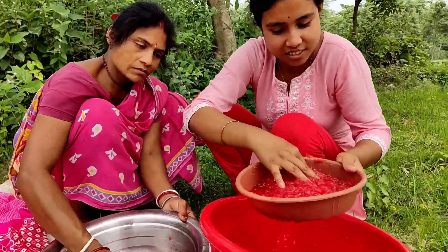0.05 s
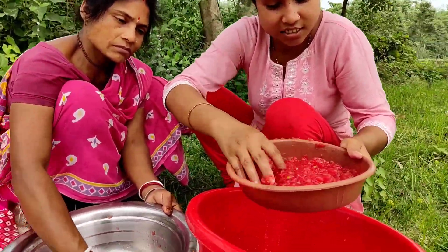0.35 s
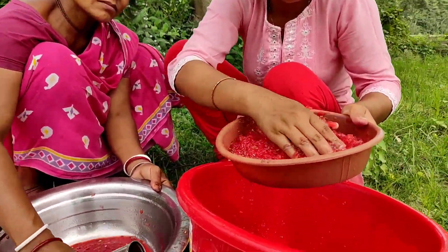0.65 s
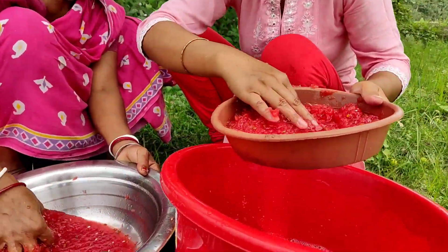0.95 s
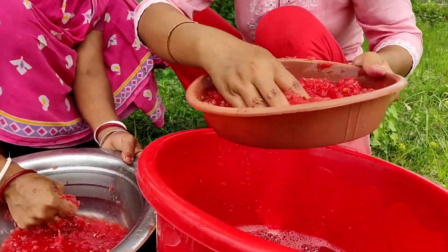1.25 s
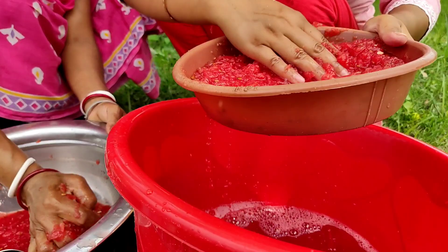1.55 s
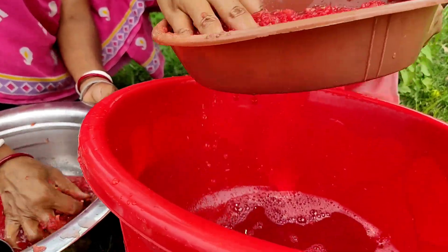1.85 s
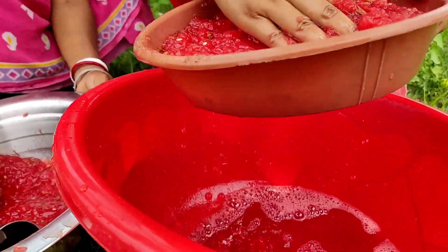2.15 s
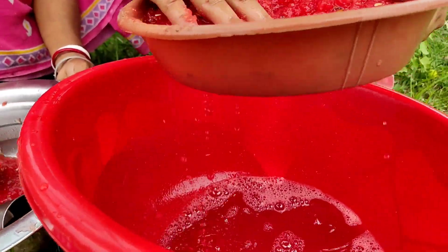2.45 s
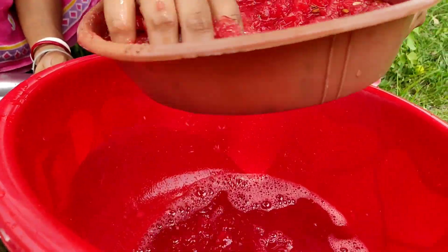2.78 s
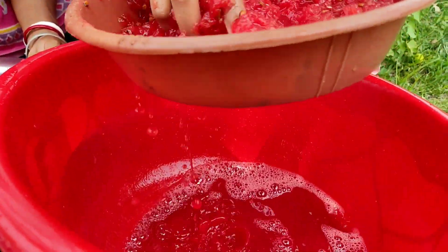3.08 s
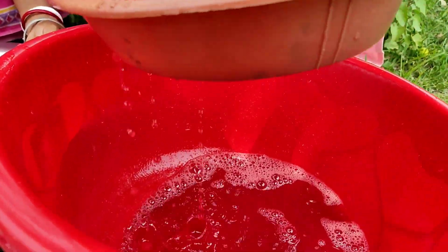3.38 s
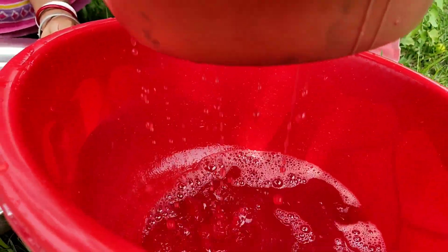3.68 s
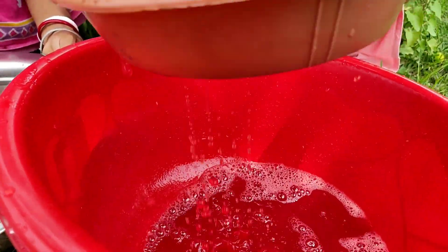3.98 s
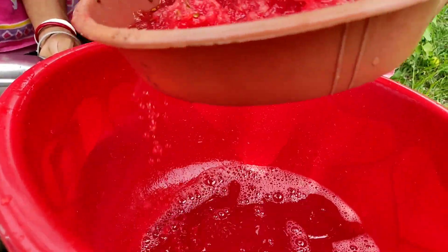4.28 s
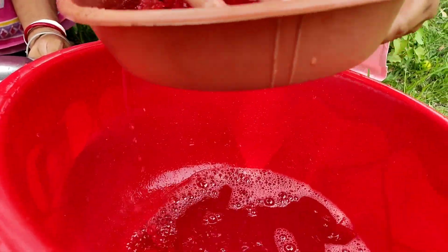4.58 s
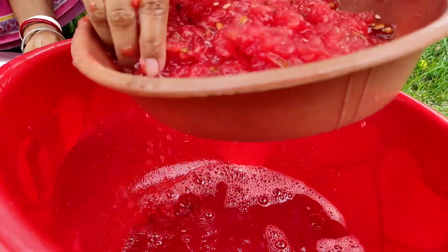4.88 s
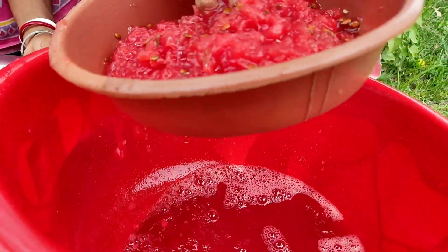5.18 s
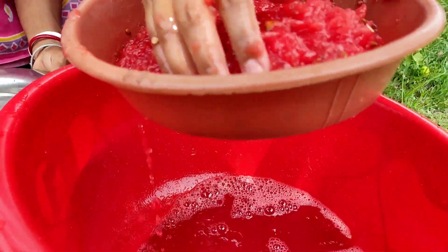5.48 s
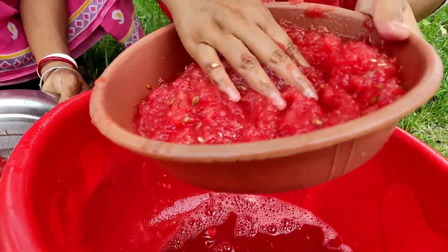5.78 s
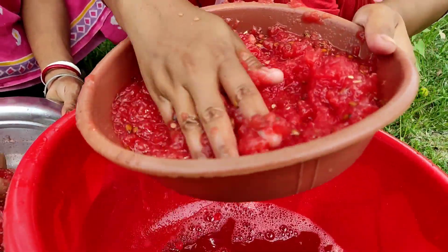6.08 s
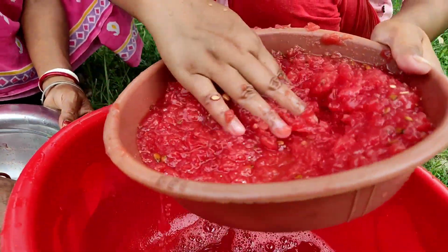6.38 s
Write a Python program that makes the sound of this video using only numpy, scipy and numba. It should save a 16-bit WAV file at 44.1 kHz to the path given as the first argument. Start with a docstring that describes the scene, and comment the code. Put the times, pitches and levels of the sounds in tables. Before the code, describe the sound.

Juice trickles and splashes unevenly into a tub while crushed fruit is squished by hand, with a few knocks and light wind.

```python
"""Crushed fruit is pressed by hand through a plastic sieve over a plastic tub, outdoors, close to a phone.
Light wind rumbles on the microphones as the first stroke starts a fine spatter. Air pockets squelch in
the pulp, drops tick into the juice and ring tiny bubbles, and now and then wind thumps or a vessel is
knocked. At 1.2 s a wet hand squeaks on a steel basin; at 5.4 s the palm smears pulp and the basin rings
thinly; three falling slurps come at the end. The tub's close walls add a brief echo."""
import sys
import numpy as np
from scipy import signal
from scipy.fft import rfft, irfft
from scipy.io import wavfile
from numba import njit

SR = 44100
rng = np.random.default_rng(int(sys.argv[2]) if len(sys.argv) > 2 else 0)


def unload_audio(sound):
    """Save the sound as a 16-bit wav file, at the path given as the first command line argument."""
    columns = np.transpose(np.atleast_2d(sound))
    # keep every value between -1 and 1, then stretch to whole-number steps
    steps = np.round(np.clip(columns, -1, 1) * 32767)
    wavfile.write(sys.argv[1], SR, steps.astype(np.int16))


N = 292585
TEN_MS = SR // 100


def undb(db):
    """Decibels to gain."""
    return 10 ** (np.asarray(db) / 20)


def unit(x):
    """Scale to rms 1."""
    return x / np.sqrt(np.mean(x ** 2) + 1e-20)


def burst(x, db=0):
    """Give a short sound the energy of 10 ms at this level."""
    return x * undb(db) / np.sqrt(np.mean(np.sum(x ** 2, axis=-1)) / TEN_MS + 1e-20)


def add(out, x, start_s):
    """Mix a short sound in."""
    i = max(int(start_s * SR), 0)
    out[:, i:i + x.shape[-1]] += x[..., :max(N - i, 0)]


def pan(left_db):
    """Constant-power gains, the left this much above the right."""
    return unit(undb(np.array([[left_db], [-left_db]]) / 2))


def colour(x, spectrum):
    """Equalise through (freq_hz, gain_db) points."""
    hz, db = np.transpose(spectrum)
    bins_hz = np.maximum(np.fft.rfftfreq(x.shape[-1], 1 / SR), 1)
    return irfft(rfft(x) * undb(np.interp(np.log(bins_hz), np.log(hz), db)), x.shape[-1])


def crackle(size, per_s, scatter_db):
    """Random tiny impacts of very unequal strength."""
    strength = undb(scatter_db * np.minimum(rng.exponential(size=size), 2.17))
    return (rng.random(size) < per_s / SR) * strength * rng.choice([-1, 1], size)


def pair(draw, width=1):
    """Two channels that share one signal and each have some of their own."""
    return draw() + width * np.array([draw(), draw()])


@njit
def state_variable(x, hz, q):
    """Band-pass filter with a centre for every sample."""
    out, band, low = np.empty(len(x)), 0., 0.
    for i in range(len(x)):
        g = np.tan(np.pi * min(hz[i] / SR, .45))
        v = (band + g * (x[i] - low)) / (1 + g * (g + 1 / q))
        band, low, out[i] = 2 * v - band, low + 2 * g * v, v / q
    return out


def resonance(x, hz, q, passes=1):
    """Ring x at a steady or moving pitch."""
    for _ in range(passes):
        x = state_variable(x, hz * np.ones(len(x)), float(q))
    return x


# Tone of the garden hush and of the wind rumble: freq_hz, gain_db
HUSH_EQ = [(59, -53), (100, 11.5), (299, 3), (452, 0), (1120, -4), (2680, -2.5), (6650, -16), (8700, 2),
           (14000, -41)]
WIND_EQ = [(15, 0.5), (35, 5.5), (90, -0.5), (150, -14), (220, -21), (500, -33.5)]
# Fader ride of the wind: time_s, level_db
WIND_RIDE = [(0.0, -39.5), (1.52, -58), (1.64, -45.5), (2.08, -53), (2.55, -45.5), (2.99, -50.5),
             (3.51, -47), (4.11, -51.5), (4.23, -46.5), (5.55, -53.5), (6.62, -43)]


def garden_air(wind_trim_db=3, gust_db=2, gusts_per_s=34):
    """A steady garden hush, and wind that buffets each microphone separately."""
    hush = unit(colour(pair(lambda: rng.standard_normal(N), width=.57), HUSH_EQ))
    wind = unit(colour(rng.standard_normal((2, N)), WIND_EQ)) * pan(4)
    ride_db = np.interp(np.arange(N) / SR, *np.transpose(WIND_RIDE))
    knots = np.arange(0, N + SR, SR / gusts_per_s)
    gusts = np.interp(np.arange(N), knots, rng.standard_normal(len(knots)))
    return hush * undb(-56) + wind * undb(ride_db + wind_trim_db + gust_db * gusts)


# Hand strokes through the pulp: start_s, length_s, sieve_db, pool_db
STROKES = [(0.01, .17, -43, -48.5), (0.463, .54, -42.5, -50.5), (1.182, .14, -41.5, -52),
           (1.467, .18, -43.5, -50), (1.793, .09, -42, -52), (2.2, .16, -45.5, -51),
           (2.428, .09, -37.5, -43), (2.596, .17, -41, -50), (2.924, .16, -43, -55),
           (3.129, 0.48, -47, -51.5), (3.571, .33, -38, -42.5), (3.973, .13, -34, -42),
           (4.257, .06, -43, -48), (4.432, .27, -43, -53.5), (4.882, .11, -39.5, -50),
           (5.101, .14, -44.5, -54.5), (5.345, .08, -42, -49.5), (5.517, .06, -44, -72),
           (5.859, .16, -41, -47.5), (6.129, .1, -44, -51), (6.239, .05, -42, -40), (6.36, .07, -44, -46.5),
           (6.435, .1, -38, -47)]


def juice_flow(attack_s=.011, release_s=.028, sag_db=1.5, trickle_db=(-50, -56.5)):
    """Sieve and pool gains: over a steady trickle, each stroke swells, then sags as it runs dry."""
    t, power = np.arange(N) / SR, undb(trickle_db)[:, None] ** 2
    for start_s, length_s, *levels_db in STROKES:
        age = t - start_s
        swell = np.clip(age / attack_s, 0, 1) * np.exp(-np.maximum(age - length_s, 0) / release_s)
        sag = undb(sag_db * (.5 - np.clip(age / length_s, 0, 1)))
        power = power + (swell * sag * undb(levels_db)[:, None]) ** 2
    return np.sqrt(power)


def spurts(per_s, fade_s, scatter_db, floor_db):
    """Envelope of juice coming in uneven spurts that jump up and die away over a steady floor."""
    count = int(per_s * N / SR)
    late, loud = rng.random((count, 2)).T
    starts = ((np.arange(count) + late) / count * N).astype(int)
    arrivals = np.bincount(starts, undb(2 * scatter_db * (loud - 1.5)), N)
    power = signal.lfilter([1], [1, -np.exp(-2 / (fade_s * SR))], arrivals)
    return np.sqrt(power + undb(2 * floor_db))


@njit
def ring_bubbles(rows):
    """Each bubble is a sine that swells and fades, its pitch gliding a little every cycle."""
    out = np.zeros((2, N))
    for start, hz, cycles, glide, left, right, phase_lag in rows:
        first, phase = int(start), 0.
        for i in range(min(int(4 * cycles * SR / hz), N - first)):
            turns = i * hz / SR
            phase += 2 * np.pi * hz / SR * (1 + glide * turns)
            fade = np.exp(-turns / cycles) - np.exp(-4 * turns / cycles)
            out[0, first + i] += left * fade * np.sin(phase - phase_lag)
            out[1, first + i] += right * fade * np.sin(phase)
    return out


def bubbles(per_s, low_hz, high_hz, cycles, scatter_db, glide=0):
    """A swarm of bubbles, unequal in size and strength, spread over the pool."""
    when, pitch, life, loud, rise, place, lag = rng.random((int(per_s * N / SR), 7)).T
    gain = undb(scatter_db * np.minimum(-np.log(1 - loud), np.pi))
    side = undb(10 * (place - .5))
    hz = low_hz + (high_hz - low_hz) * pitch
    return ring_bubbles(np.column_stack([when * N, hz, cycles * (.5 + life), glide * (2 * rise - .5),
                                         gain * side, gain / side, np.pi * (2 * lag - 1)]))


# Tone of bright spray and of dull churning pulp: freq_hz, gain_db
SPRAY_EQ = [(2500, -16), (4200, -8.5), (5800, -5.5), (8500, 3.5), (11500, -2.5), (14000, -10.5)]
PULP_EQ = [(130, -10), (230, 4.5), (290, 12), (440, -5), (640, -2), (1100, -1), (1500, -2.5), (2100, -0.5),
           (2600, 0.5), (3300, 2), (5000, -17.5)]


def spatter():
    """Pulp swishes over the mesh and threads of juice break up: tiny bubbles fizz, larger ones gurgle."""
    splashes = spurts(per_s=22, fade_s=.0062, scatter_db=4.5, floor_db=-18.5)
    shoves = spurts(per_s=18, fade_s=.013, scatter_db=4.5, floor_db=-19.5)
    glugs = spurts(per_s=30, fade_s=.028, scatter_db=3.4, floor_db=-17)
    tiny = bubbles(per_s=3200, low_hz=3090, high_hz=14520, cycles=7.2, scatter_db=3.9)
    large = bubbles(per_s=520, low_hz=485.5, high_hz=2284, cycles=3.7, scatter_db=4, glide=.012)
    fizz = unit(colour(tiny, SPRAY_EQ) * splashes)
    swish = unit(colour(pair(lambda: crackle(N, 12000, 5.2), width=.91), SPRAY_EQ) * shoves)
    gurgle = unit(colour(large, PULP_EQ) * glugs)
    churn = unit(colour(crackle(N, 1200, 6.1), PULP_EQ) * shoves)
    sieve, pool = juice_flow()
    return (fizz + swish * undb(-3)) * sieve + (gurgle + churn * undb(-1.5)) * pool


# Wet plops and smacks, and one light vessel ping at 5.78 s: time_s, level_db, pitch_hz
PLOPS = [(.05, -36.5, 807), (0.09, -36, 1280), (.109, -40.5, 848), (0.188, -42.5, 1716), (.286, -38, 1230),
         (0.346, -35.5, 2700), (.466, -40.5, 1550), (.741, -39.5, 1103), (.814, -36, 3460),
         (0.893, -30, 4470), (1.154, -38, 4140), (1.579, -36.5, 572), (1.624, -36, 862),
         (1.838, -35.5, 1095), (1.873, -38.5, 1003), (2.005, -36, 862), (2.114, -36, 788),
         (2.135, -34, 906), (2.457, -29.5, 769), (2.565, -38, 983), (2.63, -40, 1025), (2.696, -33.5, 816),
         (2.818, -40, 1093), (2.881, -42, 1444), (2.992, -33, 5240), (3.127, -38.5, 920),
         (3.167, -41.5, 940), (3.271, -38, 2640), (3.468, -42.5, 860), (3.495, -36, 938),
         (3.646, -36, 1068), (3.745, -35, 793), (3.787, -34, 1030), (3.841, -36, 900), (3.882, -38, 1454),
         (3.907, -29.5, 895), (3.991, -31, 1483), (4.032, -32.5, 862), (4.084, -32, 1126),
         (4.307, -43.5, 1099), (4.337, -38.5, 1021), (4.661, -35, 4010), (4.689, -39.5, 1875),
         (4.87, -31.5, 4800), (4.908, -40, 988), (4.941, -33, 3250), (4.972, -40, 1494), (5.246, -38, 3276),
         (5.369, -41, 526), (5.703, -35.5, 4970), (5.733, -39, 2784), (5.748, -27.5, 4300),
         (5.782, -34.5, 2095), (5.917, -29, 3560), (5.972, -34, 4700), (6.252, -36.5, 2465),
         (6.268, -37, 1507), (6.337, -35, 861)]
# Air drawn slowly in behind the fingers: time_s, level_db, pitch_hz
FINGER_SLURPS = [(6.396, -39.5, 1080), (6.467, -36.5, 990), (6.538, -36, 990)]


def squelches(trim_db=-1, max_sag=.2397, steady_hz=1700, opening_1khz_s=.0047, slurp_s=.0116):
    """Bursting films ring air pockets: large ones plop and sag in pitch, small ones smack, slow ones sing.
    The light vessel ping uses the same short, steady ring as a smack."""
    out, preroll_s = np.zeros((2, N)), .03
    t = np.arange(10 * TEN_MS) / SR - preroll_s
    plops = [(time_s, db, hz, opening_1khz_s * np.sqrt(1000 / hz), max_sag * rng.random())
             for time_s, db, hz in PLOPS]
    slurps = [(*row, slurp_s, max_sag) for row in FINGER_SLURPS]
    for time_s, db, hz, opening_s, sag in plops + slurps:
        stage = t / opening_s + .5
        swell = np.exp(-.75 * (stage + np.exp(np.minimum(-2 * stage, 10)) / 2))
        pitch = hz * np.exp(-sag / (1 + (hz / steady_hz) ** 10) * np.tanh(stage - .5))
        tone = burst(swell * np.sin(2 * np.pi * np.cumsum(pitch) / SR))
        films = swell * pair(lambda: crackle(len(t), 4000, 3.1), width=.98)
        hollow = burst(resonance(films[0], pitch, q=4))
        smack = burst(np.array([resonance(film, pitch, q=1.18, passes=2) for film in films]))
        splat = burst(colour(films, PULP_EQ), -12)
        noisiness = np.sqrt(hz / steady_hz) * min(opening_1khz_s / opening_s, 1)
        squelch = tone + ((hollow + smack) / 2 + splat) * noisiness
        add(out, burst(squelch, db + trim_db), time_s - preroll_s)
    return out


def stray_drops(per_s=4, tick_db=-37.5, spray_db=-41.5):
    """Rows of faint drops that fall by chance, oftener the more juice runs."""
    count = int(per_s * N / SR)
    jitter, loud, place = rng.standard_normal((3, count))
    poured = np.cumsum(juice_flow()[0])
    share = (np.arange(count) + .5 + jitter / 2) / count % 1
    times_s = np.searchsorted(poured / poured[-1], share) / SR
    return list(zip(times_s, tick_db + 2.5 * loud, 1.5 * place, [spray_db] * count))


# Foreground drops: time_s, tick_db, pan_left_db, spray_db
LEAD_DROPS = [(.1973, -33.5, -2, -61), (.487, -37, -8, -38), (.5765, -36, 11, -34.5),
              (.6212, -31, 1.5, -48), (.938, -40, 0, -36), (.9964, -52, -9, -32), (1.3856, -33.5, 4.5, -35),
              (1.4533, -30.5, 4.5, -36.5), (1.5923, -25.5, -3.5, -39), (1.623, -33.5, -4, -33),
              (1.718, -42, 7, -30.5), (1.8, -29.5, 9.5, -54), (1.8344, -31.5, 9, -28.5),
              (1.9788, -36.5, 3, -42), (2.2793, -30.5, 0, -57), (2.325, -39, 0, -35),
              (2.601, -35.5, -1, -35), (2.649, -43, 2, -31.5), (2.9214, -31.5, -5.5, -33),
              (2.9897, -29.5, -4, -31), (3.066, -33.5, -1, -54), (3.2786, -36, 2, -37),
              (3.328, -40.5, 0, -33), (3.421, -37.5, -4, -39), (3.5557, -27, 2, -31),
              (3.5838, -25, -2, -31), (3.6528, -36, 2, -24.5), (3.6725, -25.5, -8, -27.5),
              (3.7425, -24.5, 0, -33), (3.781, -31, -2, -35), (3.8316, -28.5, -3, -31),
              (4.022, -31, 6, -32.5), (4.0557, -26.5, -5, -23.5), (4.1602, -19, -2.5, -57),
              (4.385, -31, 4, -54), (4.4304, -19.5, -2.5, -26.5), (4.4853, -32, -1, -26.5),
              (4.5274, -27, -1, -39), (4.726, -33, 8, -42), (4.7585, -37, 18, -36), (4.857, -30, -2, -35),
              (4.8684, -28, 0, -34), (4.934, -34, 0, -27), (4.992, -39, 0, -32.5), (5.0387, -17, 7, -35.5),
              (5.059, -29.5, -11, -57), (5.4182, -32, 3, -38), (5.5063, -32, 3, -52),
              (5.8723, -37, -7, -34), (6.178, -32, 8, -37), (6.2382, -31.5, 1.5, -43),
              (6.2574, -32, 13.5, -30), (6.35, -28.5, 8, -33), (6.439, -19.5, -5.5, -32),
              (6.517, -30, 2, -36)]


def drops(ping_hz=9000, rise_s=.00012, ping_s=.00061, snap_s=.00098, lead_s=.0032, spray_s=.0056):
    """Each drop snaps on the surface and traps a bubble that pings, amid fine spray and a dull splat."""
    out, preroll_s = np.zeros((2, N)), .01
    t = np.arange(5 * TEN_MS) / SR - preroll_s
    age = np.maximum(t, 0)
    cloud = np.exp(np.where(t < 0, t / lead_s, -t / spray_s))
    ping_shape = (1 - np.exp(-age / rise_s)) * np.exp(-age / ping_s)
    for time_s, tick_db, left_db, spray_db in list(LEAD_DROPS) + stray_drops():
        hz = ping_hz * np.exp(.012 * left_db + .0071 * rng.standard_normal())  # higher on the left
        ping = ping_shape * np.sin(2 * np.pi * hz * age + rng.uniform(0, np.pi, (2, 1)))
        clicks = (t > 0) * np.exp(-age / snap_s) * rng.standard_normal((2, len(t)))
        snap = np.array([resonance(click, hz, q=1.76, passes=2) for click in clicks])
        tick = (burst(ping) + burst(snap, -3)) * pan(left_db)
        spray = colour(cloud * pair(lambda: crackle(len(t), 5000, 1.9)), SPRAY_EQ) * pan(left_db / 2)
        splat = colour(cloud * crackle(len(t), 4000, 1.6), PULP_EQ)
        drop = burst(tick, tick_db) + burst(spray, spray_db) + burst(splat, spray_db - 15)
        add(out, drop, time_s - preroll_s)
    return out


# Short low thumps, mostly wind on the microphones, one with a knock: start_s, level_db, pitch_hz
LOW_THUMPS = [(0.26, -33, 102), (2.45, -24, 101), (4.225, -33, 66.4), (4.473, -34, 73.5)]


def thumps(fade_s=.0067):
    """A low pulse swells and dies within a few cycles, louder on the left."""
    out, t = np.zeros((2, N)), np.arange(20 * TEN_MS) / SR
    for start_s, db, hz in LOW_THUMPS:
        phase = 2 * np.pi * hz * t
        pulse = t * np.exp(-t / fade_s) * (np.sin(phase) + .48 * np.sin(1.44 * phase))
        add(out, burst(pulse * pan(7), db), start_s)
    return out


# Knocks on the vessels: start_s, level_db, contact_s
VESSEL_KNOCKS = [(.891, -29, 0.003), (1.179, -21, 0.0091), (2.435, -21.5, 0.0047), (3.592, -27, 0.0052)]
# Ring of a knocked vessel: pitch_hz, level_db, t60_s
VESSEL_MODES = [(725, -3.5, 0.011), (1270, -11.5, 0.02), (2082, -1, 0.055), (3150, -3, 0.069),
                (4196, 3.5, 0.019), (5050, -8, 0.06), (8240, 1.5, 0.015)]


def knocks(crack_db=-2, vary_db=1.5):
    """A chattering contact rings the vessel, with a different balance of modes each time."""
    out, t = np.zeros((2, N)), np.arange(SR // 2) / SR
    for start_s, db, contact_s in VESSEL_KNOCKS:
        contact = t / contact_s * np.exp(-(t / contact_s) ** 2)
        chatter = contact * pair(lambda: crackle(len(t), 7000, 2.5))
        body = 0
        for hz, mode_db, t60_s in VESSEL_MODES:
            mode = undb(-60 * t / t60_s) * np.sin(2 * np.pi * hz * t + rng.uniform(0, np.pi, (2, 1)))
            ring = signal.fftconvolve(chatter, mode, axes=-1)[:, :len(t)]
            body += burst(ring, mode_db + vary_db * rng.standard_normal())
        crack = burst(colour(chatter, SPRAY_EQ), db + crack_db)
        add(out, burst(body * pan(.45), db) + crack, start_s)
    return out


# Partials of the rubbed steel basin: pitch_hz, level_db
BASIN_PARTIALS = [(1227, -33), (4380, -34.5), (4950, -46)]


def basin_squeak(start_s=1.19, length_s=.094, gain=.5):
    """A wet hand rubs the steel basin, whose partials swell and stop with the rub."""
    out, rub = np.zeros((2, N)), rng.standard_normal(int(length_s * SR))
    swell = np.hanning(len(rub))
    partials = sum(undb(db) * unit(swell * resonance(rub, hz, q=45)) for hz, db in BASIN_PARTIALS)
    add(out, partials * gain, start_s)
    return out


def palm_smear(start_s=5.4, length_s=.37, ring_hz=3320, level_db=-47):
    """Pulp sticks and slips under the palm: a wet rasp fades, a thin ring of the rubbed basin lingers."""
    out, t = np.zeros((2, N)), np.arange(int(length_s * SR)) / SR
    slips = crackle(len(t), per_s=2500, scatter_db=5)
    rasp = unit(resonance(slips, ring_hz, q=3) * np.exp(-t / .057))
    ring = unit(resonance(slips, ring_hz, q=35))
    add(out, (rasp + ring / 2) * signal.windows.tukey(len(t), .2) * undb(level_db), start_s)
    return out


def tub_echo(x, left_lag_s, echo_db=-5, t60_s=.049, first_s=.00153):
    """Close plastic walls return a brief dense echo; the direct sound reaches the right side first."""
    t = np.arange(10 * TEN_MS) / SR
    response = colour(rng.standard_normal((2, len(t))), [(300, -17), (900, -15.5)])
    response *= (t > first_s) * undb(-60 * t / t60_s)
    response *= undb(echo_db) / np.sqrt(np.sum(response ** 2, axis=1, keepdims=True))
    response[0, int(left_lag_s * SR)] += 1
    response[1, 0] += 1
    return signal.fftconvolve(x, response, axes=-1)[:, :N] / np.sqrt(1 + undb(echo_db) ** 2)


def scene():
    """The tub in the open air: the pool lies nearly straight ahead, the vessels' rims to the right."""
    sieve = tub_echo(spatter() + palm_smear(), left_lag_s=.00023)
    pulp = tub_echo(squelches(), left_lag_s=.00012)
    drips = tub_echo(drops(), left_lag_s=.00023)
    rims = tub_echo(knocks() + basin_squeak(), left_lag_s=.00035)
    return garden_air() + sieve + pulp + drips + thumps() + rims


def record(dry, top_hz=14300):
    """The phone: brighter on the left at the very top, on the right just below; soft clip, high cut."""
    tilt = np.array([(1000, -.3), (4000, -.37), (8500, -1.6), (12000, 2.5)])  # freq_hz, gain_db
    mics = np.array([colour(dry[0], tilt), colour(dry[1], tilt * [1, -1])])
    rounded = mics / (1 + mics ** 4) ** (1 / 4)
    return signal.sosfilt(signal.ellip(8, .2, 70, top_hz, fs=SR, output="sos"), rounded)


dry = scene()
out = record(dry)
unload_audio(out)
```